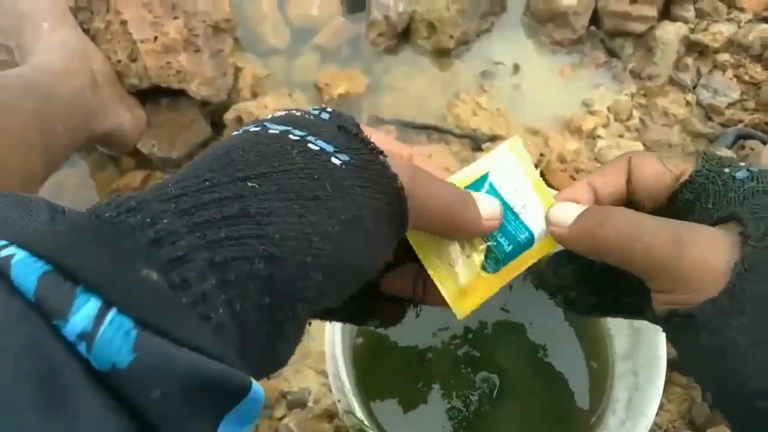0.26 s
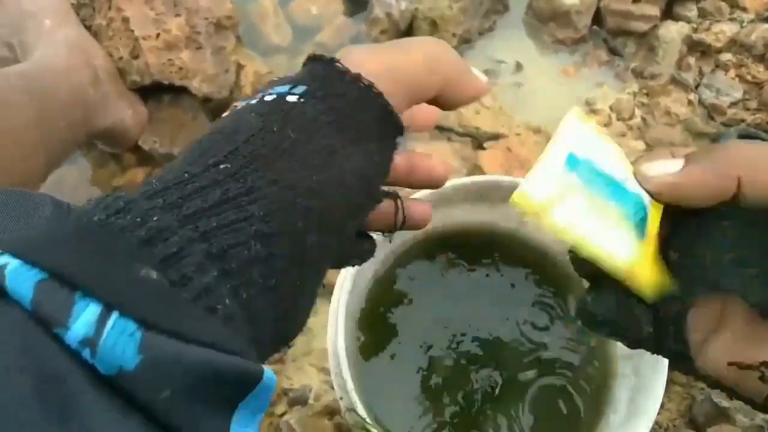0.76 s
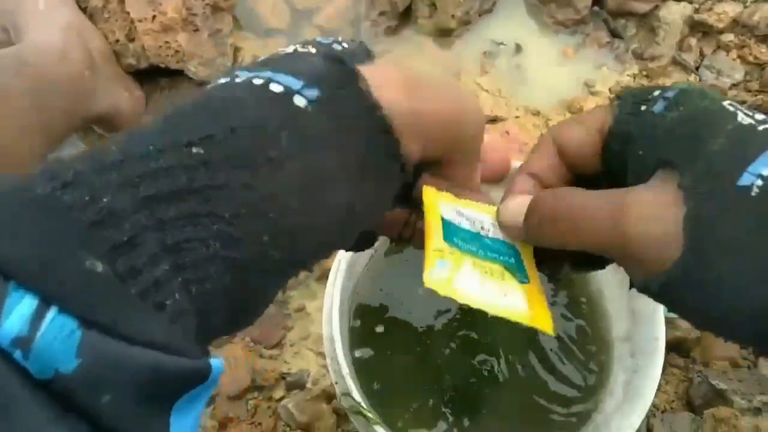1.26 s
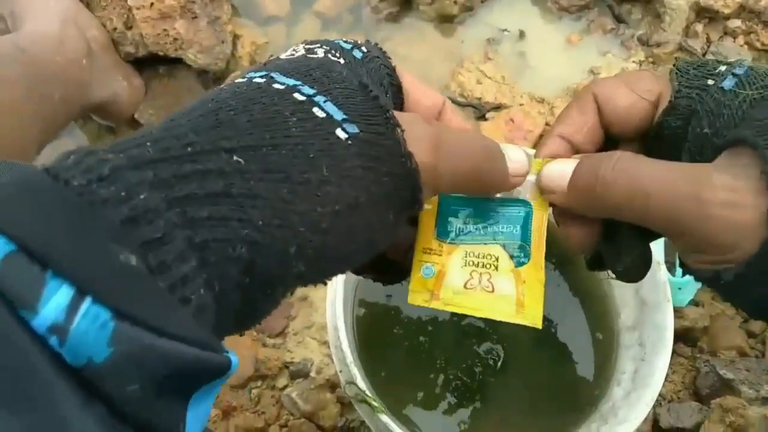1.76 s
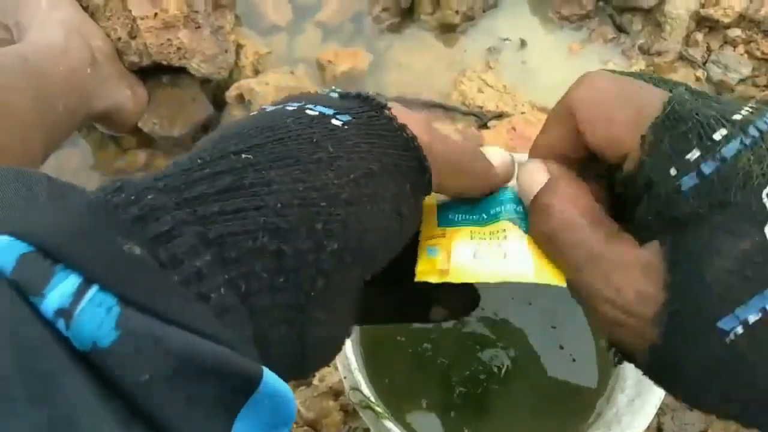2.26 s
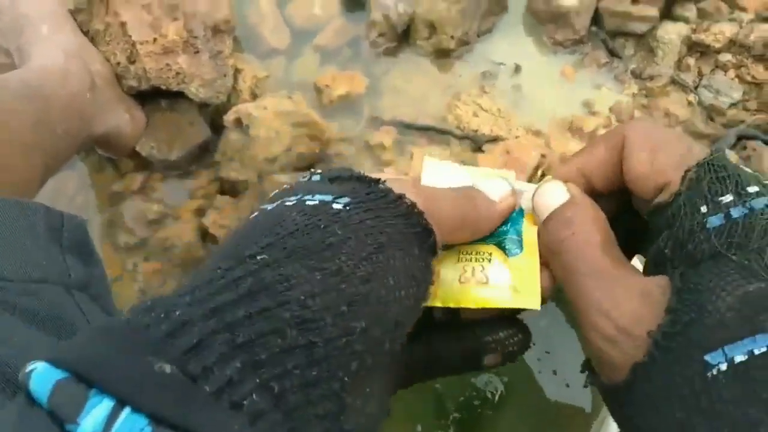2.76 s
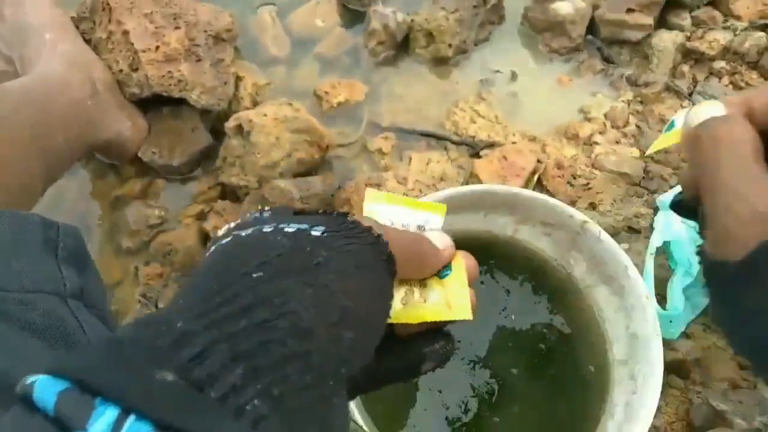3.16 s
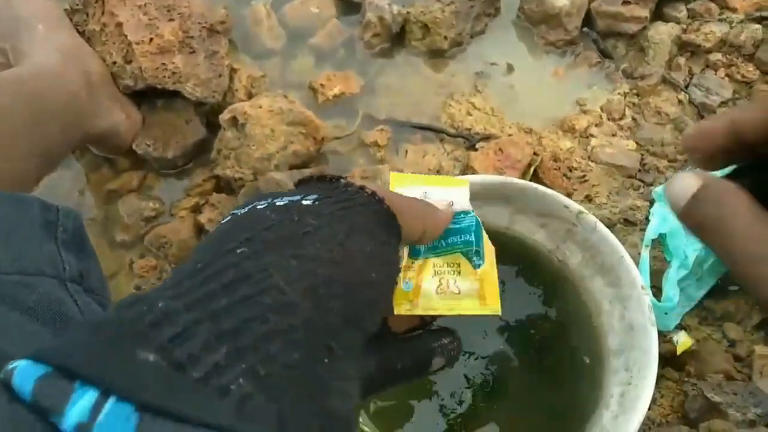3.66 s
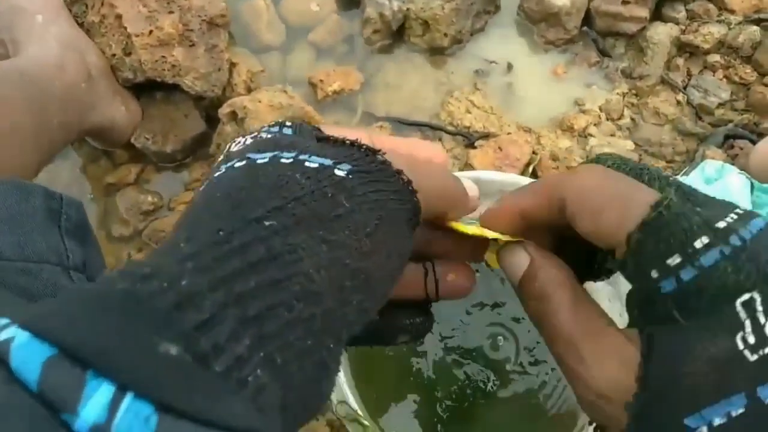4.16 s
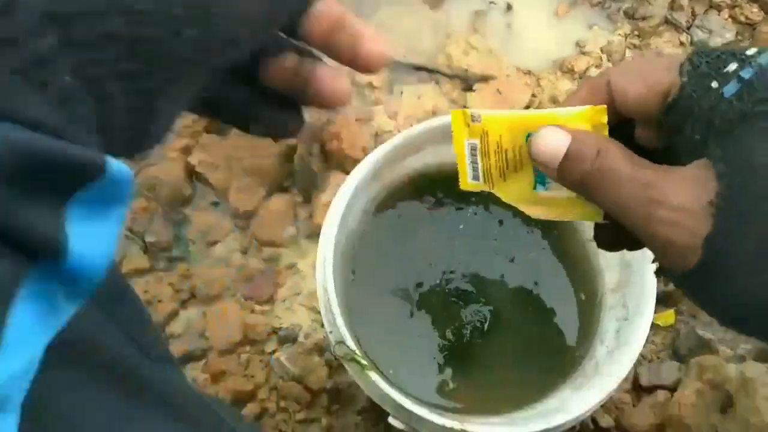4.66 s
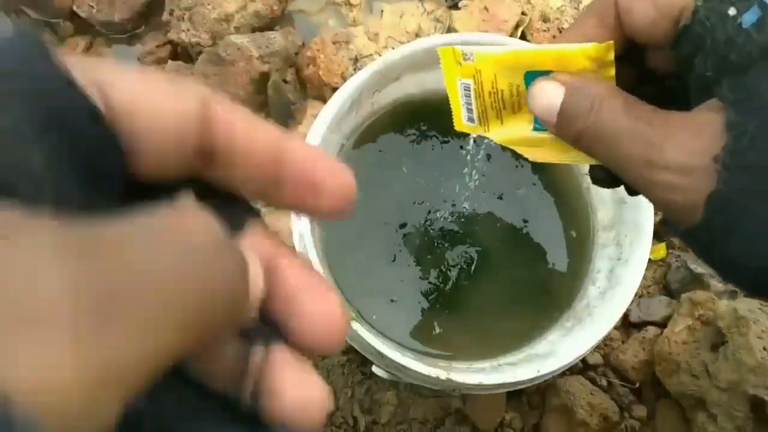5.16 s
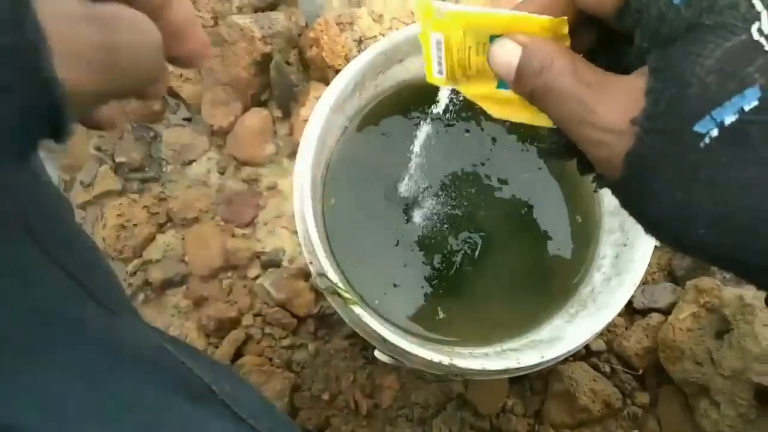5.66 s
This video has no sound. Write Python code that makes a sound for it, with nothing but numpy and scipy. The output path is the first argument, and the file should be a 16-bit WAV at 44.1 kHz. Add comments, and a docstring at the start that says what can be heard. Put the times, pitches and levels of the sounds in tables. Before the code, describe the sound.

Crisp, dry crinkling of a little powder packet being flicked, pinched and torn, over a faint low outdoor rumble, gradually growing quieter.

```python
"""Sharp snaps and dry crackling close by: a foil-plastic sachet is shaken, pinched, torn and tipped over a bucket outdoors.
A buckling crease is a short noise burst that rings the resonances of the pouch and of small facets of film.
Each move of the fingers flexes the film and slides the powder: a swarm of tiny noise grains over smooth friction.
Late on, two tiny bubbles plop as decaying tones of rising pitch.
Behind it all lie a low distant rumble and a faint hiss, both shaped from noise."""
import sys
import numpy as np
from scipy import signal
from scipy.fft import rfft, irfft
from scipy.io import wavfile

SR = 44100
rng = np.random.default_rng(int(sys.argv[2]) if len(sys.argv) > 2 else 0)


def store_wav(level_fs):
    """Save 16-bit WAV to argv[1]."""
    pcm = np.round(np.clip(np.atleast_2d(level_fs), -1, 1) * 32767)
    wavfile.write(sys.argv[1], SR, pcm.T.astype(np.int16))


N = 261513
TIME = np.arange(N) / SR

# Every pan_db is the left level minus the right level; source levels are nominal, ahead of the later stages.
# creases snapping: start_s, crack_level_db, hollow_knock_db (against the crack),
# brightness_db (top of the crack against the crack), pan_db
CREASE_SNAPS = [(.008, -24.5, -7, -2, 1.5), (.1321, -23, -9.5, 2.5, -0.5), (.1538, -31, -3, 2, 11),
                (.2062, -25, -8.5, 4.5, 0), (.2125, -17.5, -16, -5.5, 0.5), (.2561, -36.5, -5, -1.5, -2),
                (.35, -29.5, 0, -1, 1), (.387, -24, -13, 2.5, 1.5), (.5363, -47.5, -21, 19, 2),
                (.7745, -14, -10.5, 6.5, 2), (.825, -33, -34, 3, 5), (.9335, -20.5, -6.5, 3.5, 3),
                (1.0058, -21, -18, -1, 4), (1.0216, -18, -18, -1, -1), (1.052, -9, -11.5, 1, -4.5),
                (1.0609, -14, -12.5, 3, 8), (1.1283, -18, -2.5, 2, 2), (1.1585, -8.5, -7.5, 4.5, -0.5),
                (1.1863, -20, -12, 0.5, 1.5), (1.2304, -20, -32, 1, 5), (1.2633, -9, -10, -0.5, -2),
                (1.2758, -24, -22, 5.5, -4), (1.3397, -16, 2, -5, -2), (1.3657, -11.5, -2.5, 9, -2),
                (1.4405, -31.5, -10, -12.5, 2), (1.4501, -16.5, -8.5, 0.5, -2), (1.4604, -22, -6, 10.5, 1),
                (1.4761, -32, -3, 16.5, -1), (1.5862, -22, -8, 2.5, 8), (1.6045, -24, -7, -1.5, 1.5),
                (1.6532, -25, -2.5, -3, 0.5), (1.704, -31, -11, -1, -3), (1.727, -24, -28, 3, 0),
                (1.7368, -20.5, -6.5, -2, 0), (1.763, -27.5, -12.5, -1, 6), (1.8119, -37.5, -13, 0.5, -8),
                (2.0272, -40, -14.5, -6, 2), (2.122, -47, -23.5, 7.5, 0), (2.145, -46, 4, -5.5, -1),
                (2.201, -41, -8, -2, -4.5), (2.3035, -43, -2, -2, -2), (2.3343, -24, -15, -0.5, 3),
                (2.3421, -19.5, -23, 0.5, -2), (2.3656, -37, -7.5, -1.5, -3), (2.404, -31, -15.5, -4, 2),
                (2.449, -21, -16, 1.5, 0), (2.4617, -20.5, -11.5, 1, -1), (2.4826, -27, -21, 10, -1),
                (2.5614, -32, -19, 9, -8), (2.5735, -24, -15.5, -1.5, 2), (2.644, -28.5, -14, 0, 1),
                (2.6667, -28, -12, -5, 0.5), (2.7102, -26, -13, -5.5, -11), (2.794, -47, -20.5, 14, 1),
                (2.8066, -57, -20, 10, -8.5), (3.0438, -22.5, -10, 0, -12.5), (3.0937, -39, -13, -3, -10),
                (3.165, -51, -18, 16, -1), (3.2593, -22.5, -9, -1, 1), (3.2765, -27.5, -6.5, 2.5, 0),
                (3.4377, -43, -11, 8, 7), (3.4891, -40.5, -13.5, -9.5, -5.5),
                (3.7049, -42, -14.5, 18, -2.5), (3.736, -44.5, -13, 5.5, -10), (3.9753, -31, -9.5, 5.5, 2),
                (4.0942, -41.5, -12, -3, 0), (4.1634, -25.5, -6.5, -0.5, -0.5),
                (4.2608, -53.5, -19, 10, -14), (4.3245, -34, -11.5, -3, -3),
                (4.3418, -38.5, -5.5, -6.5, -3), (4.3732, -43, -12, 0.5, -1), (4.413, -51, -12, 8, 5),
                (4.6355, -24.5, -24, 2, 1), (4.974, -44, -12, -4, -3.5), (5.3629, -26, -11.5, -2, 1),
                (5.3857, -43, -16, 3, 1), (5.712, -29, -15.5, -0.5, -4), (5.7957, -50, -9.5, 13, -8),
                (5.9025, -38, -9, 0, -9)]
# ranges of a snap, in turn hollow knock, middle, crack, top of the crack: low_hz, high_hz
SNAP_RANGES = [(350, 1200), (1200, 2300), (2300, 5500), (5500, 15500)]
# resonances of the pouch held between the fingers: centre_hz, width_hz, level_db
POUCH_MODES = [(881, 120, 9.5), (1747, 600, 9), (3020, 130, -5.5), (4367, 280, 3.5), (5390, 580, 9),
               (6700, 300, -5.5)]
# a snap rings the pouch's middle range, the more so the hollower it is: offset in dB, dB per dB of hollow knock
MIDDLE_DB, MIDDLE_FOLLOWS = -2, 0.48
# a crease runs longer the harder it snaps: the drop in level, dB, that halves its run
RUN_HALVES_DB = 41
# small creases: level against the rustle and its half-range, dB; exponent that gathers them in the hard moves
SMALL_DB, SMALL_SPREAD_DB, SMALL_GATHER = -4.5, 2, 0.61
# small creases: half-range of left-right scatter; hollowness against that of the move, dB
SMALL_PAN_SPREAD_DB, SMALL_KNOCK_DB = 4, -3

# moves of the fingers: height_s, level_db, rise_s and fall_s (over 20 dB), hollow_share_db (of the power)
FINGER_MOVES = [(.003, -28, .03, .024, -6.5), (.157, -26.5, .035, .042, -7),
                (.264, -37.5, 0.022, .04, -17.5), (.341, -23.5, .026, 0.056, -16),
                (.58, -34.5, .037, .045, -25.5), (.64, -44.5, .02, .12, -18),
                (.72, -23.5, 0.018, 0.041, -13.5), (.778, -21.5, .012, .05, -20),
                (0.835, -40, 0.019, .047, -14), (.911, -23, .031, .055, -13.5),
                (1.011, -23.5, .016, .11, -13), (1.058, -17.5, 0.034, .017, -4),
                (1.095, -33, .05, .012, -6.5), (1.134, -16.5, .018, 0.049, -9.5),
                (1.234, -24, .005, 0.059, -10), (1.269, -19.5, 0.027, .022, -7.5),
                (1.304, -35, .05, .04, -11), (1.34, -22.5, .018, .05, -6),
                (1.371, -17.5, .028, .016, -13.5), (1.461, -23.5, .024, .036, -10),
                (1.499, -40.5, .012, 0.035, -5.5), (1.597, -25, .04, .026, -8),
                (1.654, -38, .039, .032, -4), (1.734, -32.5, .032, .04, -11.5),
                (2.065, -54.5, .04, .03, -19), (2.302, -48.5, .012, 0.032, -8.5),
                (2.339, -32, 0.011, .038, -14), (2.46, -22.5, .011, .054, -15),
                (2.567, -22.5, .018, .035, -13), (2.645, -33.5, .11, .03, -12),
                (2.716, -27, 0.022, .038, -10.5), (2.836, -53.5, .08, .09, -10),
                (3.034, -37.5, 0.0098, .085, -5), (3.125, -40.5, .085, .053, -10),
                (3.265, -30, 0.012, .032, -10.5), (3.493, -49, .052, .07, -15.5),
                (3.706, -49.5, .009, .055, -6), (3.796, -54, .016, 0.012, -19),
                (3.979, -38.5, .022, .039, -12.5), (4.095, -50.5, .046, .02, -9.5),
                (4.165, -33.5, .019, .035, -7.5), (4.268, -52, .015, 0.016, -14),
                (4.327, -37.5, 0.0055, .06, -17), (4.644, -32.5, .062, .014, -14),
                (4.67, -35.5, .027, 0.047, -15.5), (4.747, -52.5, .059, .036, -8),
                (4.98, -54, .019, .048, -17), (5.36, -54, 0.018, .21, -10), (5.718, -52, .12, .055, -6),
                (5.907, -48, .032, .03, -14)]
# film and powder settle after a move: level against the move, time to fall 20 dB
SETTLE_DB, SETTLE_S = -25, 0.15
# colour of the rustle in the crisp film: frequency_hz, density_db (per Hz)
CRISP_COLOUR = [(1500, -27), (2300, -12.5), (2900, -2), (4200, 1), (5500, 2), (7300, 1), (8600, -0.5),
                (10500, -3), (14000, -10), (16000, -12)]
# colour of the rustle in the hollow of the pouch: frequency_hz, density_db (per Hz)
HOLLOW_COLOUR = [(120, -8.5), (250, -1), (460, -6), (820, 0.5), (1200, -10.5), (1700, 0.5), (2300, -7),
                 (3200, -25.5)]
# where the rustle sits as the hands carry the sachet about: time_s, pan_db
SACHET_PLACE = [(0, 1), (.8, 3.5), (1.3, 1), (1.8, -.5), (2.55, 3.5), (2.66, -4.5), (2.85, -3), (3.05, 2),
                (4, 1), (5, -1.5), (5.9, -6)]
# correlation of left with right: frequency_hz, likeness (0-1)
STEREO_LIKENESS = [(300, .97), (900, 0.8), (2000, 0.9), (4000, 0.5), (8000, 0), (15000, 0.4)]

# small bubbles in the bucket: start_s, start_pitch_hz, envelope_peak_db
BUBBLES = [(5.687, 336, -43), (5.6919, 440, -49)]
# colour of the open-air background: frequency_hz, density_db (per Hz)
AIR_COLOUR = [(25, -24), (50, -23), (85, -4.5), (145, 1.5), (220, -7.5), (330, -16.5), (600, -27),
              (1200, -31), (3000, -32), (7600, -29.5), (8400, -35.5), (12000, -37.5), (15000, -49.5)]
# course of the background, ahead of its quick wandering: time_s, rumble_level_db, hiss_level_db
AIR_COURSE = [(0, -60, -58), (.5, -57, -70), (1.7, -56.5, -75.5), (1.9, -67, -75), (2.3, -61, -72),
              (3.35, -62.5, -77.5), (3.6, -62.5, -66.5), (4.5, -61.5, -69), (4.83, -66, -70),
              (5.93, -61.5, -66)]
# resonances of the microphone ports: centre_hz, width_hz, left_level_db, right_level_db
PORT_MODES = [(4030, 240, -2.5, 2), (7500, 1900, -0.5, 1.5), (7220, 3500, 0.5, 4.5), (8600, 1300, -1, -9),
              (10400, 1900, 2, -6.5), (15000, 290, 4, -5.5)]
CUTOFF_HZ = 14700


def snaps(rows, run_s, give, flip, detune, facet_width_hz, facet_db, direct_db):
    """Buckling instability: a crease gives way and its noise burst excites the modes of pouch and film."""
    t = np.arange(SR // 40) / SR
    level_window = int(.0044 * SR)   # samples
    filters = [band(*edges) for edges in SNAP_RANGES]
    soften = signal.butter(1, 9000, fs=SR, output="sos")
    out = np.zeros((2, N + len(t)))
    for start_s, crack_db, hollow_db, bright_db, pan_db in rows:
        middle_db = MIDDLE_DB + MIDDLE_FOLLOWS * hollow_db
        levels_db = crack_db + np.array([hollow_db, middle_db, -bright_db / 2, bright_db / 2])
        run = run_s * 2 ** (crack_db / RUN_HALVES_DB)
        envelope = (1 - np.exp(-t / (give * run))) * np.exp(-t / (0.83 * run))
        push = rng.standard_normal((2, len(t))) * envelope
        # the flip itself, amid the small cracks
        push[0, int(give * run * SR)] += flip * rng.choice([-1, 1])
        ringing = from_db(direct_db) * push
        for hz, width, mode_db in POUCH_MODES:
            grip = np.exp(detune * rng.normal())   # the grip retunes the pouch
            ringing += from_db(mode_db) * resonate(push, hz * grip, width)
        for hz in rng.uniform(2400, 7900, size=5):   # new facets each time
            ringing += from_db(facet_db) * resonate(push, hz, facet_width_hz)
        ringing = signal.sosfilt(soften, ringing)
        at = int(start_s * SR)
        for sos, edges, level_db in zip(filters, SNAP_RANGES, levels_db):
            part = widen(signal.sosfilt(sos, ringing), np.sqrt(np.prod(edges)))
            # the burst's whole energy, spread over the window, sets its level
            part /= np.sqrt(np.sum(part ** 2, axis=1, keepdims=True) / level_window)
            out[:, at:at + len(t)] += from_db(level_db) * sides(pan_db) * part
    return out[:, :N]


def small_snaps(crisp_power, hollow_power, count):
    """Strain-driven yielding: small creases give way more often and louder the harder the film is flexed."""
    luck, size, side = rng.random((count, 3)).T
    strain = np.cumsum(np.sqrt(crisp_power) ** SMALL_GATHER)
    # one crease at random in each equal step of strain
    yield_strain = strain[-1] * (np.arange(count) + luck) / count
    at = np.searchsorted(strain, yield_strain).clip(0, N - 1)
    crisp_db = 10 * np.log10(crisp_power[at] + 1e-12)
    hollow_db = 10 * np.log10(hollow_power[at] + 1e-12)
    levels_db = crisp_db + SMALL_DB + SMALL_SPREAD_DB * (2 * size - 1)
    knocks_db = hollow_db - crisp_db + SMALL_KNOCK_DB
    pans_db = place(TIME[at]) + SMALL_PAN_SPREAD_DB * (2 * side - 1)
    return list(zip(TIME[at], levels_db, knocks_db, np.zeros(count), pans_db))


def flexing():
    """Driving power: each move swells, fades and settles, its power shared by crisp film and hollow pouch."""
    crisp_power, hollow_power = np.zeros((2, N))
    for height_s, level_db, rise, fall, hollow_db in FINGER_MOVES:
        near = slice(*np.searchsorted(TIME, [height_s - 3 * rise, height_s + .7]))
        t = TIME[near] - height_s
        away = np.minimum(np.maximum(-t / rise, t / fall), 10)
        moving = from_db(level_db - 20 * away ** 1.5) ** 2
        settling = (t > 0) * from_db(level_db + SETTLE_DB - 20 * t / SETTLE_S) ** 2
        share = min(from_db(hollow_db) ** 2, .9)
        hollow_power[near] += (moving + settling) * share
        crisp_power[near] += (moving + settling) * (1 - share)
    return crisp_power, hollow_power


def rustle(crisp_power, hollow_power):
    """Common excitation: the same crackles sound through the crisp film and the hollow of the pouch."""
    grains = crackles(per_s=7900, spread_db=4.5, clump_db=4.0, smooth=0.39)
    crisp = coloured(grains, CRISP_COLOUR, patchy_db=2.0, patch_rate=120)
    crisp = from_db(-2.0) * np.sqrt(crisp_power) * crisp
    hollow = np.sqrt(hollow_power) * coloured(grains, HOLLOW_COLOUR, patchy_db=5.0, patch_rate=60)
    # the flapping pouch also pushes a soft puff of air
    puff = rms_one(signal.sosfilt(band(22, 390), widen(rng.standard_normal((2, N)), 500)))
    puff = from_db(-18.0) * np.sqrt(hollow_power) * puff
    return sides(place(TIME)) * (crisp + hollow + puff)


def crackles(per_s, spread_db, clump_db, smooth):
    """Shot noise: uneven tiny buckles come in clumps, over the smooth friction of skin and powder."""
    born = rng.random(N) < per_s / SR
    sizes = born * from_db(spread_db * np.minimum(rng.exponential(1, N), 4))
    grains = rms_one(sizes * from_db(clump_db * drift(200)))
    return (grains + smooth) * rng.standard_normal((2, 2, N))   # two stereo sources


def place(s):
    """Level-difference localisation: the sachet's left-right dB at a time."""
    return np.interp(s, *np.transpose(SACHET_PLACE))


def hands(x, echo_db):
    """Comb interference: treble glancing off hands and bucket rim ripples each side's spectrum differently."""
    treble = signal.sosfilt(signal.butter(1, 2500, "high", fs=SR, output="sos"), x)
    out = x.copy()
    lags_s = rng.uniform(.0006, .005, (2, 5))
    for side, lags in enumerate((lags_s * SR).astype(int)):
        for lag in lags:
            out[side, lag:] += from_db(echo_db) * treble[side, :-lag]
    return out


def surroundings(x, t60, wet_db):
    """Diffuse scattering: hands, bucket and stones return a short, thin, exponentially decaying tail."""
    t = np.arange(SR // 4) / SR
    scatter = rng.standard_normal((2, len(t))) * from_db(-60 * t / t60) * (t > .002)
    scatter /= np.sqrt(np.sum(scatter ** 2, axis=1, keepdims=True))
    return x + from_db(wet_db) * signal.fftconvolve(x, scatter, axes=1)[:, :N]


def plops(decay_s, rise_per_s):
    """Bubble resonance: small bubbles ring in the water, rising in pitch as they die."""
    out = np.zeros(N)
    for start_s, hz, level_db in BUBBLES:
        t = np.maximum(TIME - start_s, 0)
        # pitch, the slope of the phase, grows by twice rise_per_s
        phase = 2 * np.pi * hz * t * (1 + rise_per_s * t)
        out += from_db(level_db) * np.exp(-t / decay_s) * np.sin(phase)
    return out


def open_air():
    """Filtered noise: a distant rumble that swells and sinks, and a faint hiss."""
    s, rumble_db, hiss_db = np.transpose(AIR_COURSE)
    hz = np.maximum(np.arange(N // 2 + 1) * SR / N, 1)
    spectrum = widen(rfft(rng.standard_normal((2, N))), hz)
    noise = irfft(spectrum * from_db(at_hz(AIR_COLOUR, hz)), N)
    rumble = rms_one(signal.sosfilt(signal.butter(2, 600, fs=SR, output="sos"), noise))
    hiss = rms_one(signal.sosfilt(signal.butter(2, 600, "high", fs=SR, output="sos"), noise))
    rumble *= from_db(np.interp(TIME, s, rumble_db) + 3 * drift(17))
    hiss *= from_db(np.interp(TIME, s, hiss_db) + 1.1 * drift(99))
    return rumble - hiss   # the two filters are in antiphase at 600 Hz


def coloured(sources, spectrum, patchy_db, patch_rate):
    """Third-octave synthesis: bands fed in turn by two stereo sources, each with a wandering gain; rms 1."""
    edges = 20 * 2 ** (np.arange(30) / 3)
    out = 0
    for k, (low, high) in enumerate(zip(edges, edges[1:])):
        if high > spectrum[0][0] and low < spectrum[-1][0]:
            hz = np.sqrt(low * high)
            gain = from_db(at_hz(spectrum, hz) + patchy_db * drift(patch_rate))
            out = out + gain * widen(signal.sosfilt(band(low, high), sources[k % 2]), hz)
    return rms_one(out)


def widen(pair, hz):
    """Partial coherence: two unrelated signals become a left and right as alike as the table says."""
    alike = at_hz(STEREO_LIKENESS, hz)
    middle = np.sqrt(1 + alike) * pair[0]
    difference = np.sqrt(1 - alike) * pair[1]
    return middle + difference * np.array([[1], [-1]])


def sides(pan_db):
    """Constant-power panning: left and right gains for one position or a run of them."""
    gains = from_db(np.array([[1], [-1]]) * pan_db / 2)
    return gains / np.sqrt(np.mean(gains ** 2, axis=0))


def resonate(x, hz, width):
    """Damped oscillator: a two-pole resonance with gain 1 on top."""
    r = np.exp(-np.pi * width / SR)
    feed = np.array([1, 0, -1]) * (1 - r * r) / 2
    return signal.lfilter(feed, [1, -2 * r * np.cos(2 * np.pi * hz / SR), r * r], x)


def band(low, high):
    """Band limiting: a gentle Butterworth band-pass."""
    return signal.butter(2, [low, high], "band", fs=SR, output="sos")


def drift(rate):
    """Random modulation: a slow wander of rms 1, about rate new values a second."""
    count = int(rate * N / SR) + 2
    return rms_one(np.interp(TIME * rate, np.arange(count), rng.standard_normal(count)))


def at_hz(points, hz):
    """Spectral interpolation: read a spectrum on a log-frequency axis."""
    freq, value = np.transpose(points)
    return np.interp(np.log(hz), np.log(freq), value)


def rms_one(x):
    """Power normalisation: scale to unit rms."""
    return x / np.sqrt(np.mean(x ** 2) + 1e-20)


def from_db(db):
    """Logarithmic level: decibels to amplitude gain."""
    return 10 ** (np.asarray(db) / 20)


def scene():
    """Superposition: the sachet, its reflections and the bubbles in the open air."""
    crisp_power, hollow_power = flexing()
    loud = from_db(1.28) * snaps(CREASE_SNAPS, run_s=.003, give=.6, flip=1.2, detune=0.062,
                                 facet_width_hz=220, facet_db=4.5, direct_db=-15.5)
    small_rows = small_snaps(crisp_power, hollow_power, count=52)
    small = snaps(small_rows, run_s=.0014, give=.4, flip=2.1, detune=.06,
                  facet_width_hz=300, facet_db=1.5, direct_db=-10)
    film = from_db(0.15) * hands(rustle(crisp_power, hollow_power), echo_db=-12.5)
    sachet = surroundings(loud + small, t60=0.15, wet_db=-23.0) + film
    return sachet + plops(decay_s=0.0089, rise_per_s=3.1) + open_air()


def record(dry):
    """Transduction: port resonances colour each side, soft saturation rounds peaks, a low-pass cuts the top."""
    for hz, width, left_db, right_db in PORT_MODES:
        dry = dry + (from_db([[left_db], [right_db]]) - 1) * resonate(dry, hz, width)
    clipped = dry / (1 + dry ** 6) ** (1 / 6)
    return signal.sosfilt(signal.ellip(10, .1, 70, CUTOFF_HZ, fs=SR, output="sos"), clipped)


dry = scene()
out = record(dry)
store_wav(out)
```